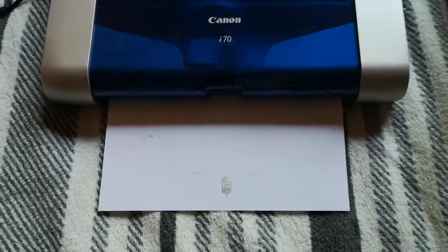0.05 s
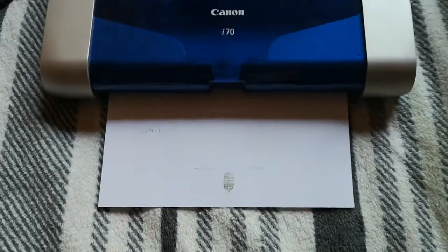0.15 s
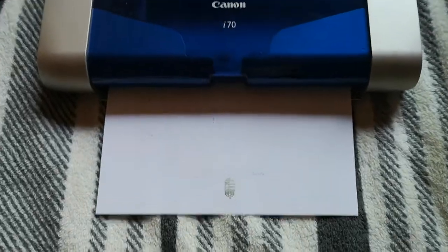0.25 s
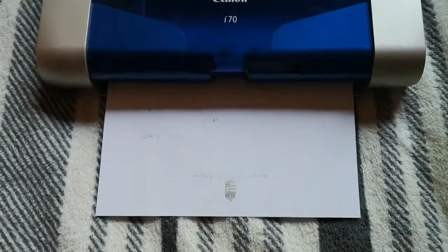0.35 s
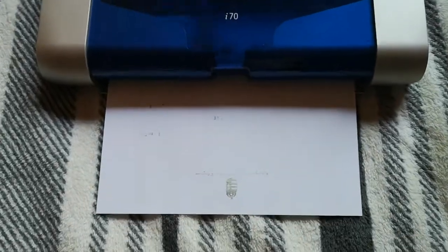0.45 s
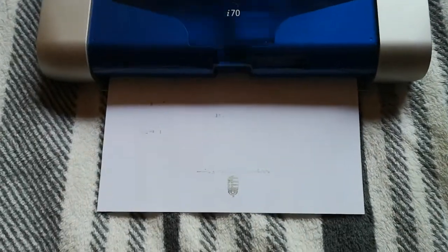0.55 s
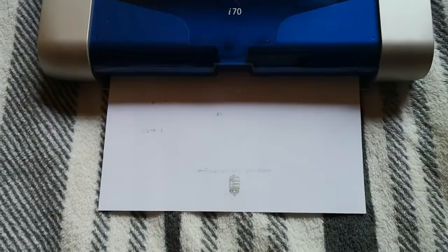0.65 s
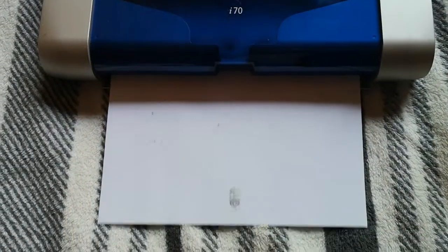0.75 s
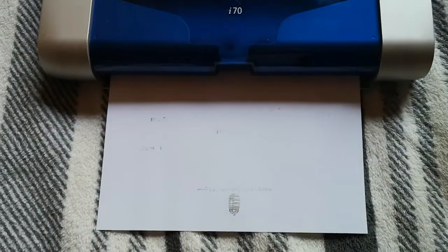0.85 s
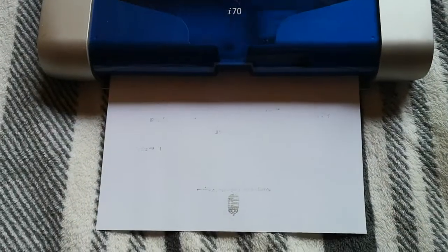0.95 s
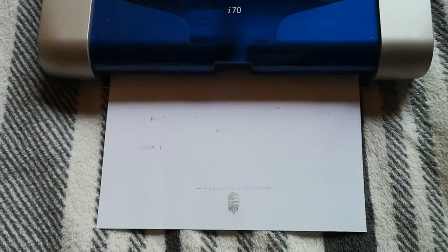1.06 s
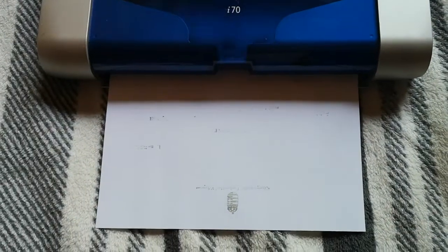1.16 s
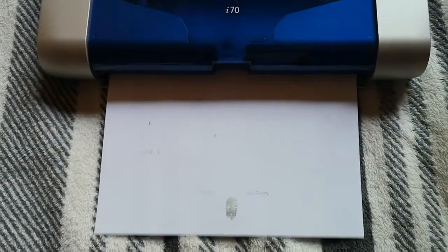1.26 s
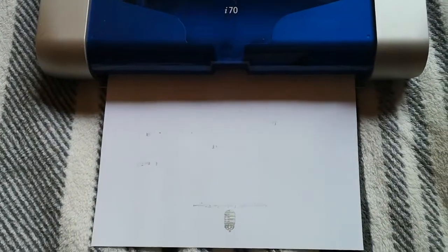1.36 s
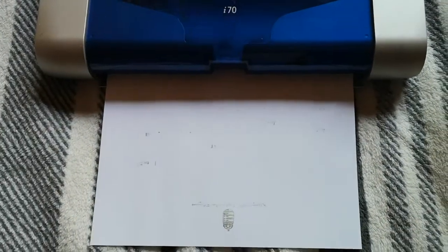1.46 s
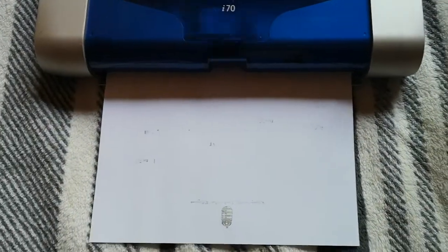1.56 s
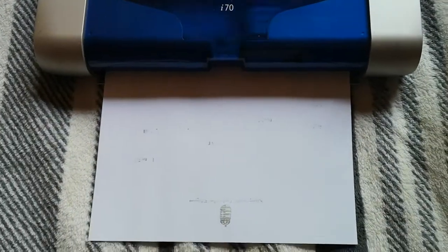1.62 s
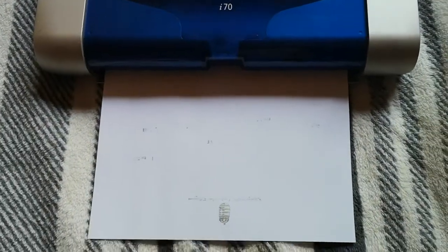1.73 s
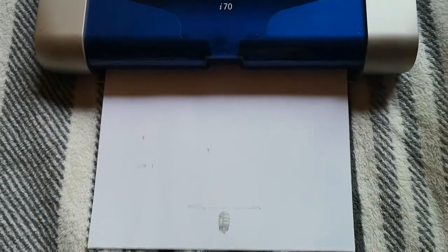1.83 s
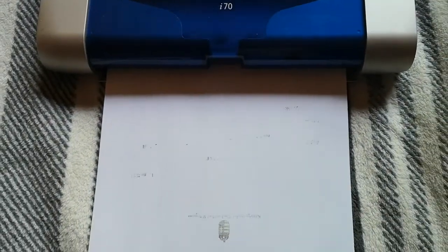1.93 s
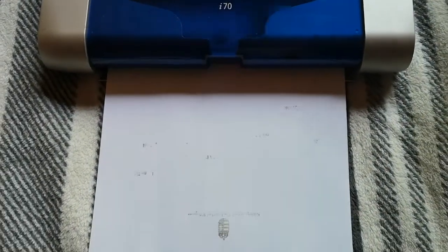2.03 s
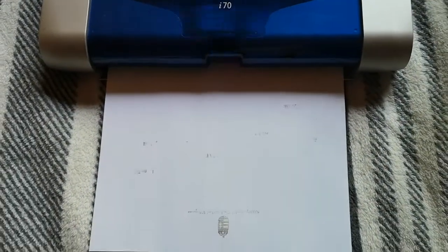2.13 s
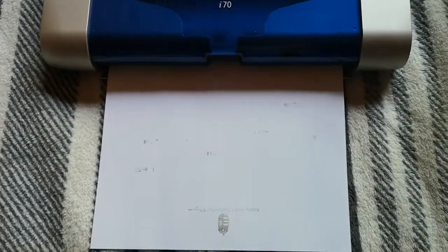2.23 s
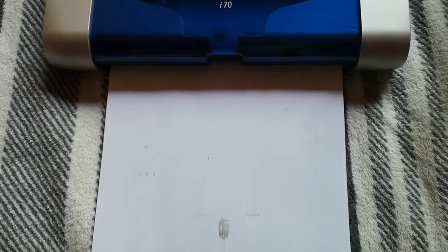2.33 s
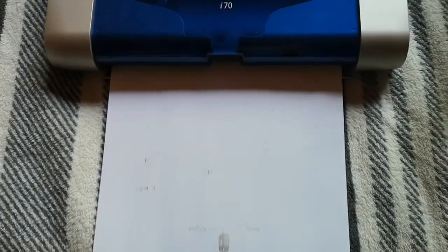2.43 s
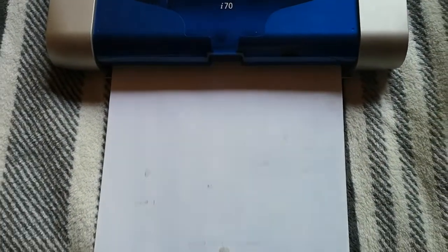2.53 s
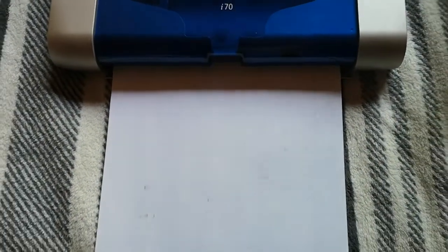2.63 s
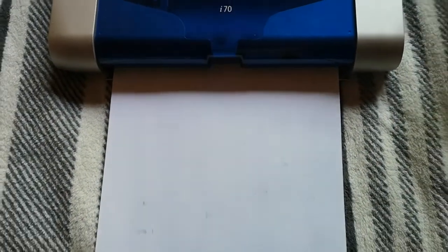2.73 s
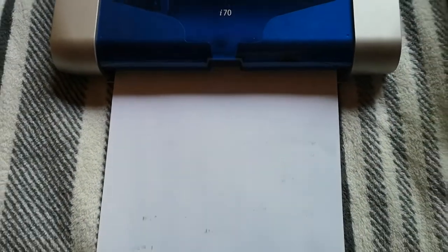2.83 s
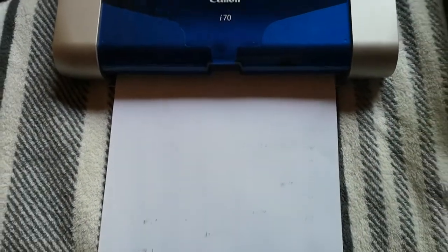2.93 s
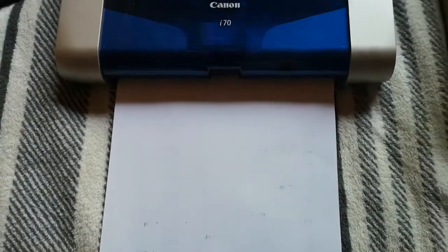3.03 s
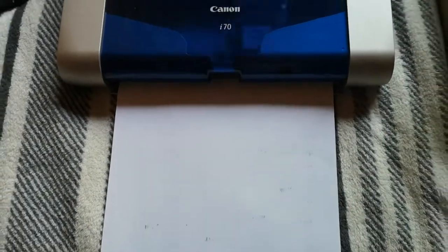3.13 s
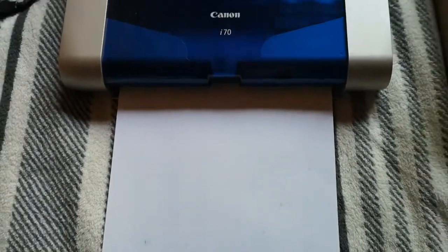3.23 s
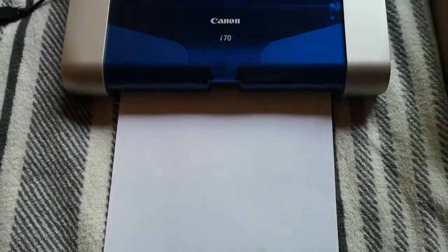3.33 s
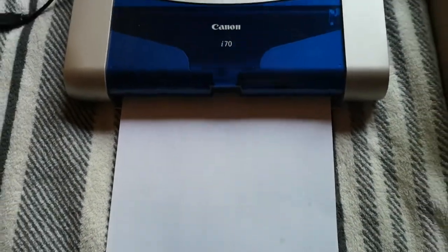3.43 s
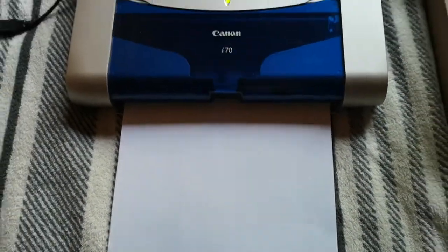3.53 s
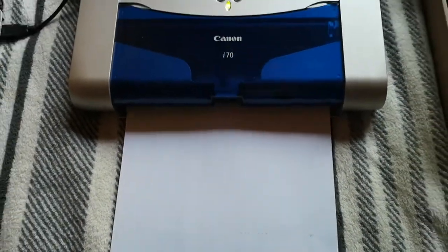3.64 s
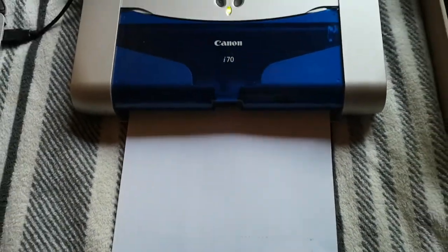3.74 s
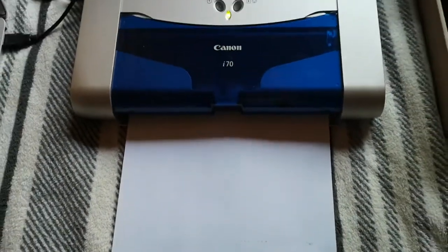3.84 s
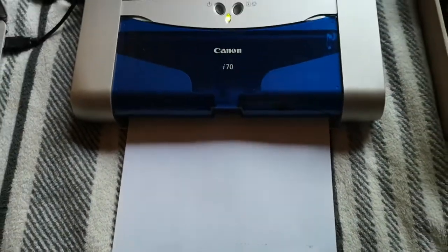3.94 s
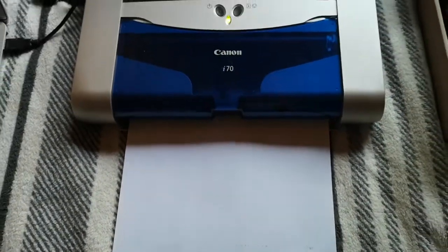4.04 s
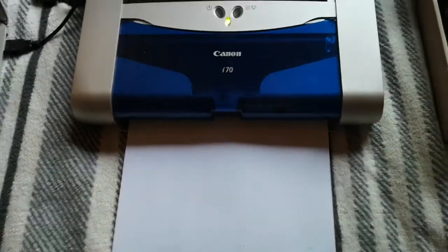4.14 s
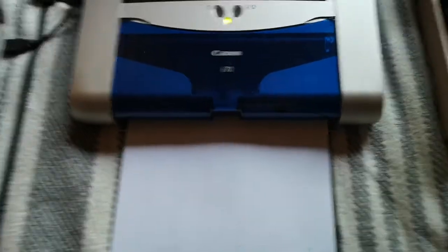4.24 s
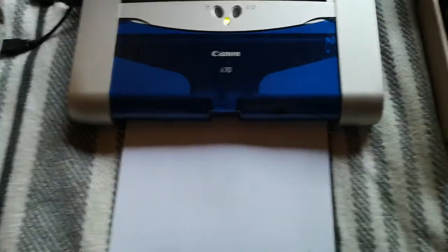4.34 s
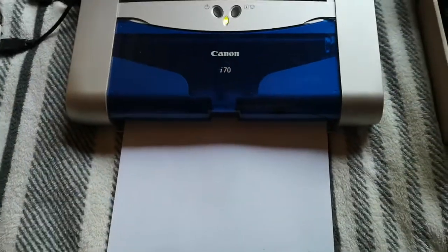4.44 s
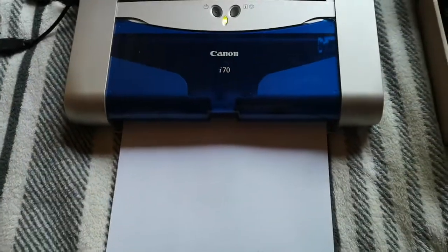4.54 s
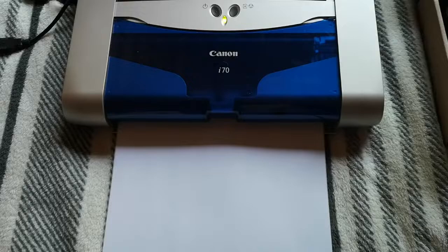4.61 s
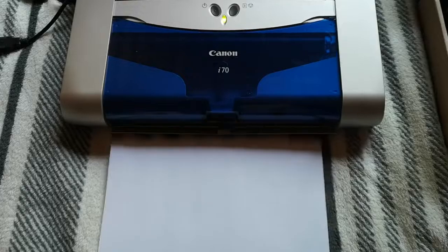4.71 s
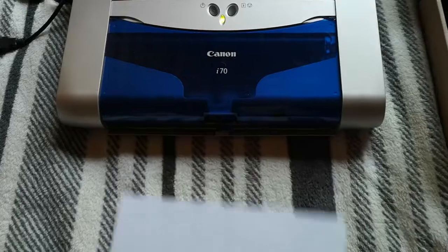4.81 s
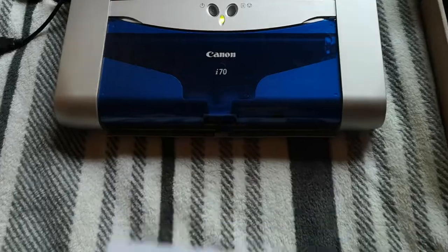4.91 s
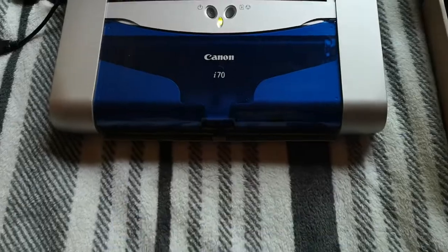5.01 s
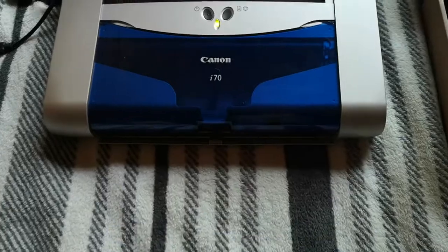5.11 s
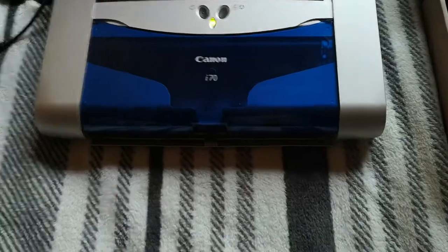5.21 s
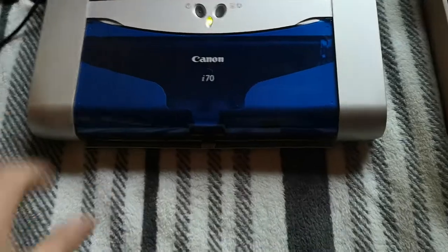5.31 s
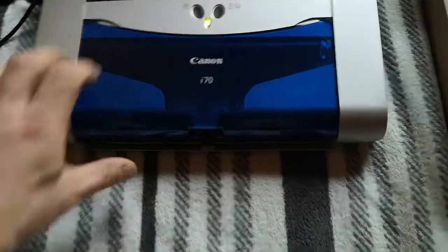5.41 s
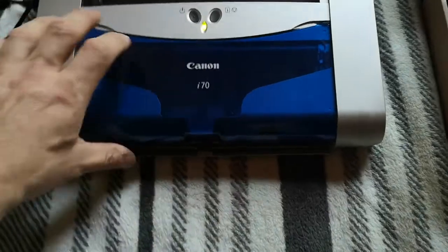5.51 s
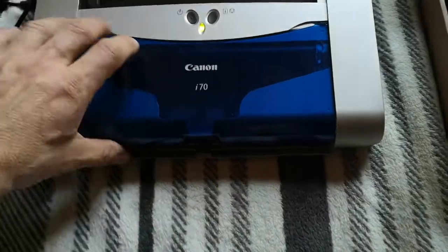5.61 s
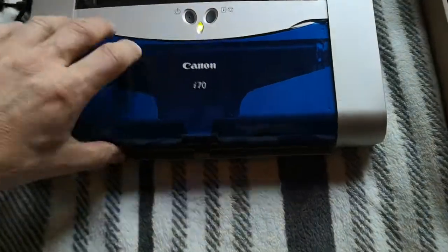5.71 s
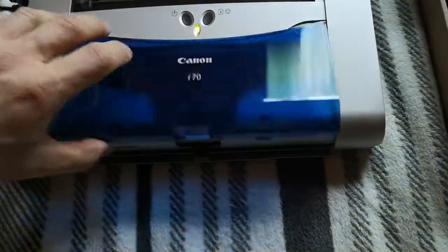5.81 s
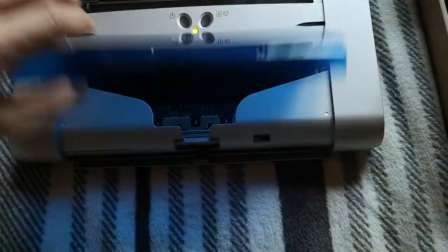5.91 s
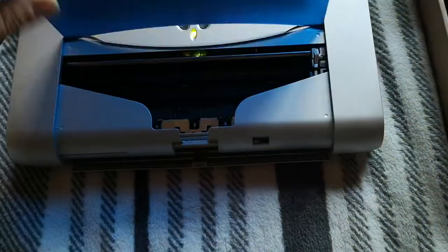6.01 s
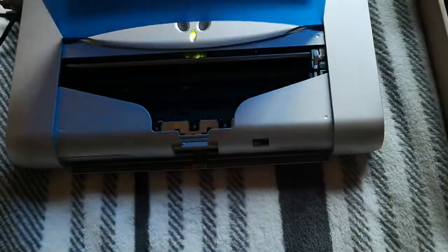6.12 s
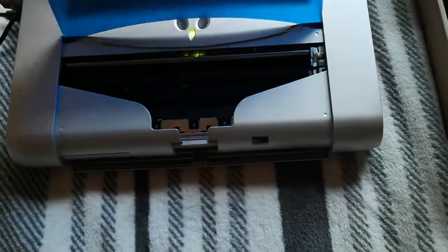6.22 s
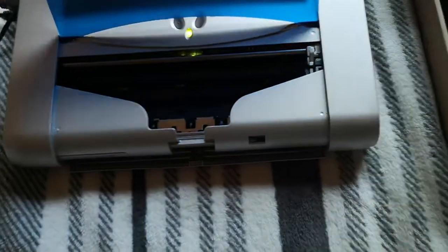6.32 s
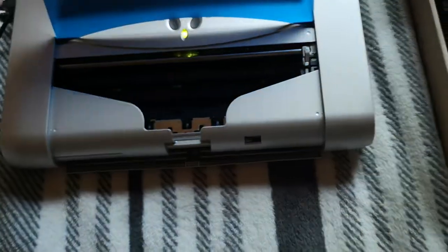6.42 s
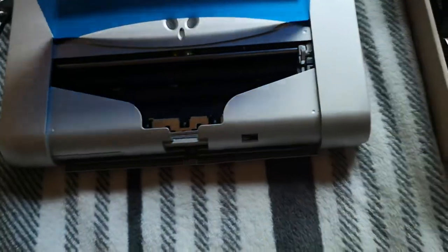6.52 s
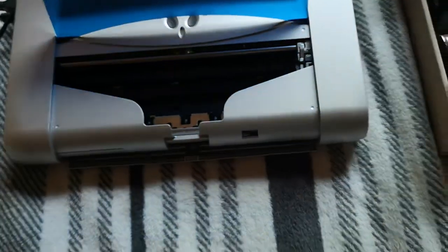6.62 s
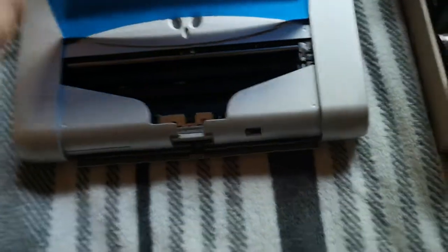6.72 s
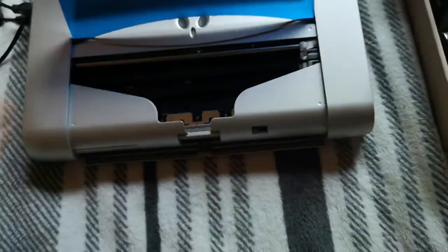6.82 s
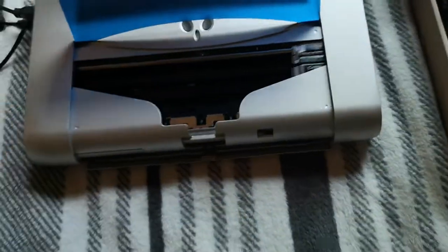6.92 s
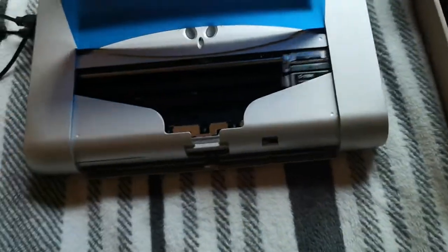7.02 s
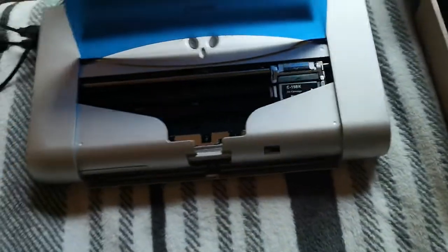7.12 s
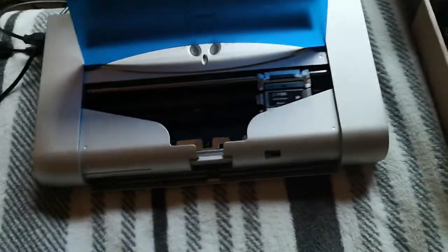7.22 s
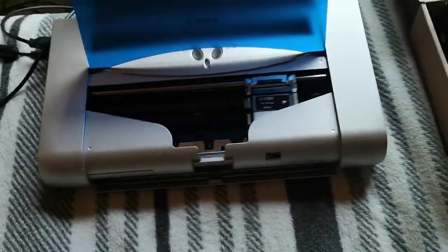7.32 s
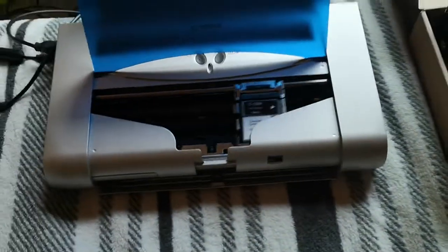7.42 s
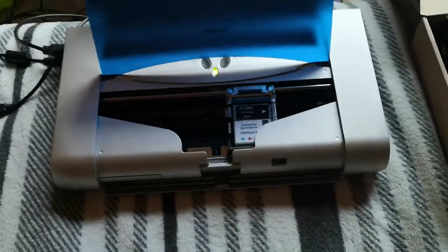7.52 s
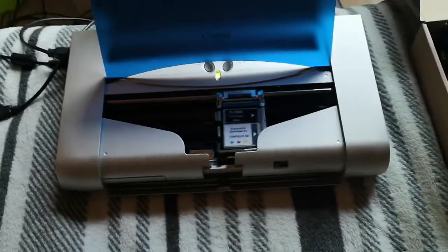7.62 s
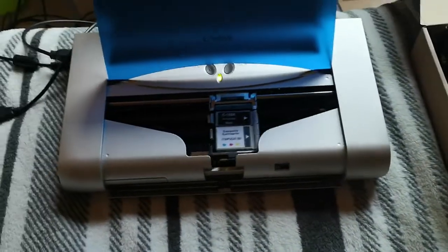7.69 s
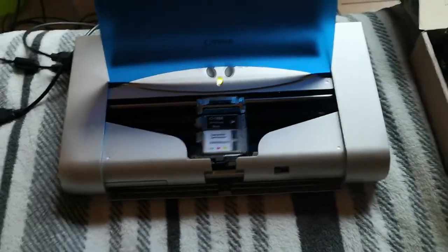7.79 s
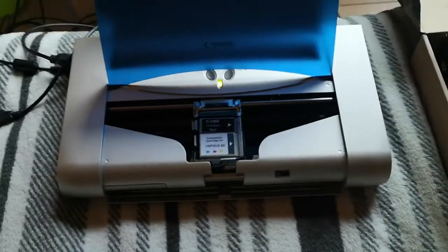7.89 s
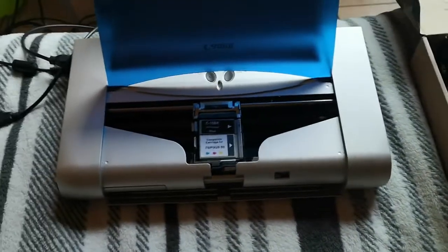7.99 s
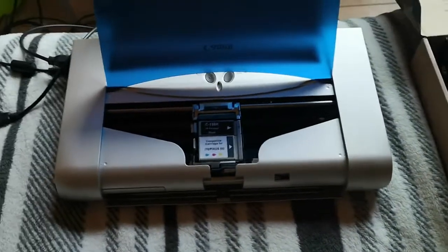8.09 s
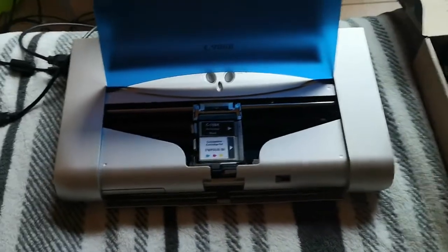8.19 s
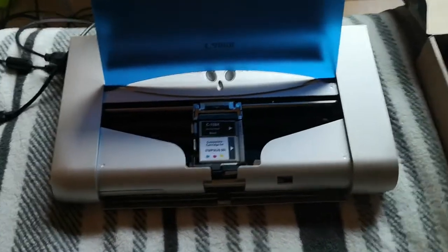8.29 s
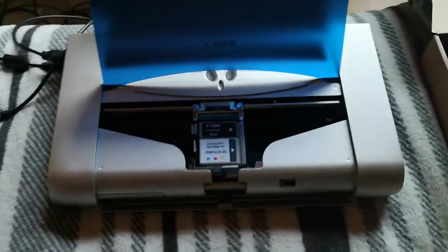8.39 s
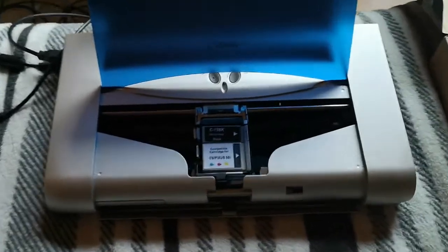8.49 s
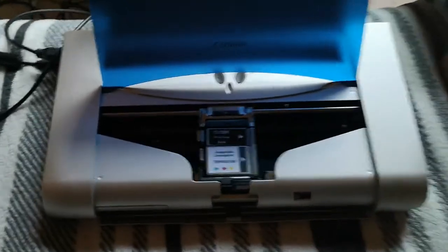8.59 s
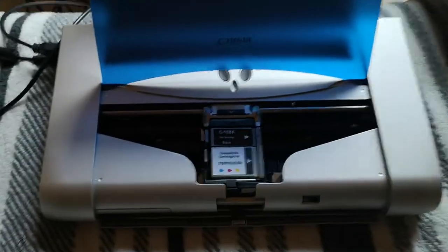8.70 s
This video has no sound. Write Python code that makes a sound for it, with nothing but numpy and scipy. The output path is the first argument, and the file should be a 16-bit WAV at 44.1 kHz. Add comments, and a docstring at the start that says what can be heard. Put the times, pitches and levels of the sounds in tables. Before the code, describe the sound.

A small inkjet printer finishes a page: loud, clacking bursts of paper feed alternate with quiet, buzzing sweeps of the print head. Two longer runs push the sheet out, and it drops with a soft rustle. The plastic lid unlatches with a sharp click and opens with small knocks and squeaks. The head then creeps along with a faint, pulsing tone. Heard close on a hand-held stereo microphone in a quiet, soft room.

```python
"""Loud, clacking runs of paper feed alternate with quiet sweeps of a belt-driven print head: a small
inkjet printer on a blanket finishes a page, heard from a hand-held stereo microphone in a soft room.
Gears rattle in the plastic case and paper hisses over the rollers; the sheet is ejected and drops.
The lid unlatches with a sharp click and swings open on a squeaky hinge, and the head creeps to the
middle of its rail with a faint, pulsing motor tone."""
import sys
import numpy as np
from scipy import signal
from scipy.fft import rfft, irfft, next_fast_len
from scipy.io import wavfile
from scipy.ndimage import uniform_filter1d

SR = 44100
rng = np.random.default_rng(int(sys.argv[2]) if len(sys.argv) > 2 else 0)


def persist_wave(psi):
    """Save psi, clipped to +-1, as 16-bit WAV."""
    counts = np.round(np.clip(psi, -1, 1) * 32767).astype(np.int16)
    wavfile.write(sys.argv[1], SR, np.atleast_2d(counts).T)


N = 385875
T = np.arange(N) / SR
FFT_SIZE = 2 * next_fast_len(N // 2 + SR // 4)
HZ = np.maximum(np.arange(FFT_SIZE // 2 + 1) * SR / FFT_SIZE, 1)

# Tone colour of each source at the microphone. Each row: frequency in Hz, relative level in dB.
ROOM_SPECTRUM = [(180, -30), (300, -1.5), (600, -11.5), (2140, -2.5), (4210, -14), (4880, -8.5),
                 (6250, -12), (7620, -8), (10100, -18.5), (14500, -20.5), (15500, -37)]
RUMBLE_SPECTRUM = [(8.8, -27), (15, 6.5), (33, -5), (59, -12.5), (134, -18.5), (162, -23), (238, -27),
                   (469, -56.5), (600, -44.5), (780, -62), (1320, -120)]
GRIP_SPECTRUM = [(30, -15), (70, -0.5), (130, 2.5), (220, -1), (340, -13), (600, -36.5), (1500, -78)]
RAIL_SPECTRUM = [(3820, -42), (6500, -26), (7850, 5), (8390, 0), (9190, 4.5), (10300, -9), (12900, -9),
                 (15000, -19)]
SOFT_HISS_SPECTRUM = [(590, -55.5), (1000, -12.5), (1120, -3.5), (1270, -12.5), (1390, -10.5), (1640, -5),
                      (2230, -3.5), (3040, -16), (4340, -16), (5040, -15.5), (5980, -16), (7610, -10.5),
                      (9250, -13), (10500, -25), (15500, -24)]   # a soft, peaky hiss while the head moves
SHEET_SPECTRUM = [(300, -32), (700, -15.5), (1200, -13), (1800, 0.5), (2400, -6.5), (3200, -15), (7500, -7),
                  (9200, -13.5), (11000, -23), (15000, -39)]
KNOCK_SPECTRUM = [(180, -58), (300, -15), (498, -15.5), (680, -1), (841, -3.5), (1700, -2), (1940, -5),
                  (2440, -7), (2920, -15), (9030, -21), (10300, -39.5), (15000, -49.5)]
LATCH_SPECTRUM = [(59, -54), (100, -18), (173, -12.5), (386, -12), (697, -5), (861, -14), (1160, -3.5),
                  (1460, -9), (1800, 1.5), (2420, -3.5), (2580, 3), (2810, -5), (6000, -15.5), (8950, -17),
                  (15500, -43.5)]
CARRIAGE_SPECTRUM = [(180, -61), (300, -24.5), (393, -22.5), (424, -22.5), (613, -1), (684, -5.5),
                     (988, -23), (1240, 0), (1380, -8), (1560, -12), (1810, -3.5), (2090, -8), (2300, -4),
                     (2990, -20.5), (4000, -17.5), (5200, -26), (8800, -120)]
PAPER_SPECTRUM = [(2060, -14.5), (3500, -0.5), (3840, 2), (5120, -5.5), (5510, 0.5), (7620, 0.5),
                  (8320, -0.5), (9350, 1.5), (11900, -15.5), (14800, -15.5), (15500, -26)]
GEAR_SPECTRUM = [(47, -41), (80, -7.5), (174, -1), (354, -11), (537, -4.5), (799, -7), (950, -6.5),
                 (1150, -1.5), (1460, -6), (1600, -1), (2000, -1), (2340, 0), (3130, -11.5), (3860, -19),
                 (5000, -16.5), (6500, -45.5), (11000, -120)]
CLACK_SPECTRUM = [(59, -29.5), (100, -25.5), (420, -12.5), (697, 0.5), (977, -12.5), (1430, -8.5),
                  (1920, 5), (3320, -7.5), (4560, -11), (5400, -15.5), (6810, -20.5), (7730, -7),
                  (8410, -19), (12300, -29), (15500, -39)]
# Resonances of the plastic. Each row: frequency in Hz, width in Hz, gain in dB.
CASE_RESONANCES = [(696, 23, 5), (769, 37, 7), (1333, 88, 4), (1580, 13, 3), (1818, 70, 4.5), (1998, 71, 5),
                   (2145, 58, 5.5), (2273, 58, 4.5), (3720, 110, 1.5), (3980, 24, -4), (4480, 100, 1.5),
                   (4980, 90, 5), (6720, 70, 6), (7402, 110, 6), (7860, 38, 2.5), (8920, 70, 7.5)]
TRAY_RESONANCES = [(1265, 52, 8), (1470, 33, 7.5), (1630, 30, 3.5), (1817, 44, 4.5), (2400, 58, 4)]   # lid and tray
# Stereo width from where the microphone is held. Each row: frequency in Hz, side against mid in dB.
ROOM_WIDTH = [(60, -28), (180, -9), (550, 5), (1650, -4.5), (4970, 1), (15000, -1)]
LID_WIDTH = [(60, -21), (130, -22.5), (290, -11), (640, -7), (1410, -4.5), (3100, 1), (6820, 0),
             (15000, 3.5)]
PRINT_WIDTH = [(60, -23), (110, -27), (200, -19), (380, -10), (700, -5), (1290, -5), (2380, 2), (4400, -2),
               (8120, 0), (15000, -1)]
# Lean to one side, as far as the width allows. Each row: frequency in Hz, left against right in dB.
ROOM_LEAN = [(60, -0.5), (240, 1), (950, 0), (3770, -0.5), (15000, -1.5)]
LID_LEAN = [(60, 1), (130, 6), (290, -5), (640, 0.5), (1410, -12.5), (3100, -3.5), (6820, 1),
            (15000, -23.5)]
PRINT_LEAN = [(60, -18.5), (99, -0.5), (160, 0), (270, 1), (450, -2), (740, -3), (1220, -4.5),
              (2010, -10.5), (3330, -1), (5500, 0.5), (9080, -9.5), (15000, -20.5)]

# A hand rubs on case or microphone. Each row: start and stop in seconds, level in dB.
HAND_RUBS = [(5.484, 5.852, -70), (7.308, 7.6, -78.5), (8.1, 8.604, -72.5)]
# Bumps on the microphone. Each row: start in seconds, level in dB, pitch in Hz, t60 in seconds.
MIC_THUMPS = [(7.36, -38, 44, 0.49), (7.379, -44, 75, 0.33), (8.11, -39.5, 21.3, 0.4),
              (8.26, -41.5, 20.1, 0.52)]
# The sheet brushes case and blanket. Each row: middle and half length in seconds, level in dB.
SHEET_SWISHES = [(4.453, 0.23, -70.5), (4.845, 0.034, -59.5), (4.955, 0.11, -71), (5.094, 0.026, -70),
                 (5.198, 0.016, -74)]
# Squeaks of the hinge. Each row: start in seconds, pitch in Hz, peak in dB, t60 in seconds.
HINGE_SQUEAKS = [(6.287, 1605, -43, 0.065), (6.34, 1595, -50, 0.15), (6.616, 1742, -52, 0.33),
                 (6.615, 4050, -62, 0.089), (6.615, 7300, -63, 0.12)]
# Ringing of the lid. Each row: frequency in Hz, relative level in dB, t60 in seconds.
LID_MODES = [(1300, -45, 0.63), (1450, -42, 0.47), (1690, -36, 0.28)]
# Single impacts. Each row: start in seconds, relative body and treble levels in dB.
SHEET_TAPS = [(4.316, -39.5, -66.5), (4.753, -44, -63.5), (5.098, -47, -74)]
LIGHT_KNOCKS = [(.573, -42.5, -68), (1.614, -48, -87), (5.802, -43, -59), (6.071, -41, -51.5),
                (6.108, -38.5, -62), (6.136, -40, -75), (6.166, -41.5, -77), (6.255, -36, -64.5),
                (6.286, -53, -76), (6.37, -52, -72), (6.615, -52, -68), (6.673, -46.5, -81.5),
                (6.878, -46, -78), (6.946, -53, -82), (8.014, -58.5, -84)]
LATCH_HITS = [(5.887, -23, -24), (5.889, -28.5, -17.5), (5.893, -22.5, -41), (5.907, -22.5, -27),
              (5.91, -33.5, -25), (5.915, -25, -38)]
GEAR_TICKS = [(.909, -35.5, -46), (2.966, -47, -34.5), (3.389, -45.5, -50), (3.936, -34.5, -48)]
# Passes of the head. Each row: start and stop in seconds, relative carriage and whine levels in dB.
HEAD_SWEEPS = [(0.083, 0.379, -61.5, -67), (0.569, .86, -57.5, -59), (1.076, 1.368, -63.5, -71),
               (1.619, 1.93, -58.5, -58), (2.172, 2.456, -62, -57.5), (3.112, 3.302, -57, -53.5)]
# Buzz of the belt. Each entry: relative level in dB of the next harmonic of the tooth rate.
BELT_HARMONICS = [-5, -22, 0, -22.5]
# Runs of the paper feed. Each row: start and stop in seconds, relative level of the first jolt in dB.
FEED_RUNS = [(.005, 0.07, -31.5), (0.38, .552, -36), (0.868, 1.047, -32), (1.418, 1.586, -50),
             (1.957, 2.146, -37), (2.483, 3.101, -39), (3.352, 3.999, -52)]
# Hum of the feed motor. Each row: frequency in Hz, level against the gear rattle in dB.
FEED_HUM = [(126, -14), (188, -18.5), (252, -22.5), (397, -25.5), (594, -16.5), (685, -18.5)]
# Clacking in the longer runs. Each row: time of one hard clack in seconds, relative hard and soft
# levels in dB.
GEAR_TURNS = [(.497, -26.5, -28), (.879, -27, -28.5), (1.447, -25.5, -27), (2.017, -25.5, -27.5),
              (2.553, -23.5, -27), (3.451, -26.5, -30)]
# Contacts within a clack. Each row: delay in seconds, body and treble against the clack's level in dB.
HARD_CLACK = [(-.004, -10.5, -22), (0, -0.5, -6), (.002, -4.5, -9)]
SOFT_CLACK = [(0, -1.5, -19), (.015, -7.5, -20)]
JOLT = [(0.00094, 0, -8)]

CREEP_START_S, CREEP_STOP_S = 6.98, 8.03


def from_db(db):
    """Decibels to gain."""
    return 10 ** (np.asarray(db) / 20)


def unit_rms(x):
    """Scale to unit rms."""
    return x / np.sqrt(np.mean(x ** 2) + 1e-20)


def over_hz(points):
    """A table joined by straight lines on a log-frequency axis."""
    hz, value = np.transpose(points)
    return np.interp(np.log(HZ), np.log(np.maximum(hz, 1)), value)


def running(start, stop, ramp_s):
    """1 from start to stop, 0 outside, with short ramps."""
    return np.clip(np.minimum(T - start, stop - T) / ramp_s + .5, 0, 1)


def drift(per_s):
    """A random wander through values of spread 1."""
    knots = rng.standard_normal(4000)
    return np.interp(T * per_s, np.arange(len(knots)), knots)


def colour(x, spectrum, resonances=()):
    """Causal filter of unit power gain with a broad spectrum and narrow resonances."""
    peaks_db = sum(db / (1 + (2 * (HZ - hz) / width) ** 2) for hz, width, db in resonances)
    cepstrum = irfft(np.log(unit_rms(from_db(over_hz(spectrum) + peaks_db))))
    cepstrum[1:FFT_SIZE // 2] *= 2   # fold to minimum phase
    cepstrum[FFT_SIZE // 2 + 1:] = 0
    return irfft(rfft(x, FFT_SIZE) * np.exp(rfft(cepstrum)))[:N]


def hiss(spectrum, resonances=()):
    """Smooth coloured noise of unit rms."""
    return colour(rng.standard_normal(N), spectrum, resonances)


def grains(per_s, spread_db):
    """Tiny random clicks of uneven strength, at unit rms."""
    clicks = (rng.random(N) < per_s / SR) * rng.choice([-1, 1], N)
    return unit_rms(clicks * from_db(spread_db * rng.standard_normal(N)))


def add(out, start, sound):
    """Mix a short sound in at a time in seconds."""
    at = max(round(start * SR), 0)
    out[at:at + len(sound)] += sound[:N - at]


def blows(rows, spectrum, resonances, body_db, treble_db, chatter_s, tail_s, tail_db):
    """Each blow chatters for a moment, then the plastic rings out; body and treble split at 3700 Hz."""
    t, body, treble = T[:SR // 4], np.zeros(N), np.zeros(N)
    fade = np.exp(-t / chatter_s) + from_db(tail_db) * np.exp(-t / tail_s)
    for start, low_db, high_db in rows:
        chatter = rng.choice([-1, 1], len(t)) * fade
        add(body, start, from_db(low_db + body_db) * chatter)
        add(treble, start, from_db(high_db + treble_db) * chatter)
    low, high = (signal.butter(3, 3700, kind, fs=SR, output="sos") for kind in ("low", "high"))
    impacts = signal.sosfilt(low, body + 1e-18) + signal.sosfilt(high, treble + 1e-18)
    return colour(impacts, spectrum, resonances)


def stereo_microphone(mid, width, lean, scatter_s):
    """The side signal is part direct sound, part sound scattered evenly by nearby surfaces."""
    side_gain, power_ratio = from_db(over_hz(width)), from_db(over_hz(lean)) ** 2
    direct = (1 + side_gain ** 2) / 2 * (power_ratio - 1) / (power_ratio + 1)
    direct = np.clip(direct, -.75 * side_gain, .75 * side_gain)
    t = T[:SR // 8]
    scatter = rfft(rng.standard_normal(len(t)) * np.exp(-t / scatter_s), FFT_SIZE)
    scatter /= np.sqrt(uniform_filter1d(np.abs(scatter) ** 2, size=1200))
    paths = direct + np.sqrt(side_gain ** 2 - direct ** 2) * scatter
    side = irfft(rfft(mid, FFT_SIZE) * paths)[:N]
    return np.array([mid + side, mid - side])


def room_tone(level_db=-73.5):
    """The faint, steady hiss of the room around the microphone."""
    return from_db(level_db) * hiss(ROOM_SPECTRUM)


def room_echo(x, wet_db, t60):
    """A soft-furnished room returns a faint, short tail to each side."""
    t = T[:SR // 2]
    tail = rng.standard_normal((2, len(t))) * from_db(-60 * t / t60) * (t > .006)
    tail /= np.sqrt(np.sum(tail ** 2, axis=1, keepdims=True))
    return from_db(wet_db) * signal.fftconvolve(x[None], tail, axes=1)[:, :N]


def handling(rumble_db=-58, lumpy_db=5):
    """Right at the microphone: low rumble, the lumpy rub of a shifting grip and a few soft thumps."""
    t = T[:SR]
    out = from_db(rumble_db + .5 * drift(4)) * hiss(RUMBLE_SPECTRUM)
    grip = sum(from_db(db) * running(start, stop, ramp_s=.079) for start, stop, db in HAND_RUBS)
    out += grip * from_db(lumpy_db * drift(22)) * hiss(GRIP_SPECTRUM)
    for start, db, hz, t60 in MIC_THUMPS:
        add(out, start, -from_db(db - 60 * t / t60) * np.sin(2 * np.pi * hz * t))
    return out


def creep_hiss(rail_db=-77, soft_hiss_db=-76):
    """The creeping head slides on its rail, along with a soft, peaky hiss."""
    rail = from_db(rail_db) * hiss(RAIL_SPECTRUM)
    soft_hiss = from_db(soft_hiss_db) * hiss(SOFT_HISS_SPECTRUM)
    return running(CREEP_START_S, CREEP_STOP_S, ramp_s=.02) * (rail + soft_hiss)


def creep_tone(level_db=-68.5, tone_hz=1255, bend_hz=45, cogging_hz=37.3, uneven_db=3):
    """At low speed the head's motor cogs: its tone swells and bends with every step."""
    cog = 2 * np.pi * np.cumsum(cogging_hz * (1 + .0368 * drift(4.7))) / SR
    pitch_hz = tone_hz - bend_hz * np.sin(cog) + 62 * drift(250)
    tone = np.sin(2 * np.pi * np.cumsum(pitch_hz) / SR)
    swell = unit_rms(np.exp(1.1 * np.cos(cog))) * from_db(uneven_db * drift(37))
    return running(CREEP_START_S, CREEP_STOP_S, ramp_s=.01) * from_db(level_db) * swell * tone


def sheet_drop(uneven_db=4.5):
    """The loose sheet flicks off the rollers, crinkles as it slides and settles on the blanket."""
    crinkles = grains(per_s=4000, spread_db=2)
    swish = sum(from_db(db) * np.exp(-((T - at) / half_s) ** 2) for at, half_s, db in SHEET_SWISHES)
    swish *= from_db(uneven_db * drift(30))
    taps = blows(SHEET_TAPS, SHEET_SPECTRUM, TRAY_RESONANCES,
                 body_db=-13.5, treble_db=4.5, chatter_s=.0073, tail_s=.029, tail_db=-2.5)
    return taps + swish * colour(crinkles, SHEET_SPECTRUM, TRAY_RESONANCES)


def hinge():
    """The swinging lid's hinge gives short, unsteady squeaks that die away."""
    out, t = np.zeros(N), T[:SR]
    for start, hz, db, t60 in HINGE_SQUEAKS:
        phase = 2 * np.pi * np.cumsum(hz * (1 + .016 * drift(204)[:SR])) / SR
        add(out, start, from_db(db - 60 * t / t60) * np.sin(phase))
    return out


def knocks():
    """Small knocks as the lid swings up and the head leaves its rest and stops."""
    return blows(LIGHT_KNOCKS, KNOCK_SPECTRUM, TRAY_RESONANCES,
                 body_db=-15.5, treble_db=9, chatter_s=.0053, tail_s=.039, tail_db=2)


def lid_latch(ring_db=-7):
    """The latch snaps and rebounds, and the lid rings on faintly."""
    out = blows(LATCH_HITS, LATCH_SPECTRUM, CASE_RESONANCES,
                body_db=-2, treble_db=2, chatter_s=.0026, tail_s=.032, tail_db=-17)
    t, snap_s = T[:SR], LATCH_HITS[0][0]
    for hz, db, t60 in LID_MODES:
        add(out, snap_s, from_db(ring_db + db - 60 * t / t60) * np.sin(2 * np.pi * hz * t))
    return out


def head_sweeps(tooth_hz=603, rise_hz=20, slide_db=-2.5, belt_db=-10.5, whine_db=-3.5, soft_hiss_db=-67):
    """Belt teeth buzz and pulse the carriage's hiss; the motor whines an octave up in mid-sweep."""
    level, whine_level, arch = np.zeros((3, N))
    for start, stop, db, motor_db in HEAD_SWEEPS:
        swell = np.sin(np.pi * np.clip((T - start) / (stop - start), 0, 1)).clip(0)
        level += from_db(db) * running(start, stop, ramp_s=.025)
        whine_level += from_db(motor_db + whine_db) * swell ** 5.5
        arch += swell
    flutter = 1 + .007 * drift(130)
    phase = 2 * np.pi * np.cumsum((tooth_hz + rise_hz * arch) * flutter) / SR
    belt = sum(from_db(db + belt_db + 5.5 * drift(25.2)) * np.sin(k * phase)
               for k, db in enumerate(BELT_HARMONICS, 1))
    friction = rng.standard_normal(N) * (1 + .36 * np.cos(phase))
    slide = from_db(slide_db) * colour(friction, CARRIAGE_SPECTRUM)
    soft_hiss = from_db(soft_hiss_db) * arch ** .34 * hiss(SOFT_HISS_SPECTRUM)
    whine = whine_level * from_db(2.5 * drift(30)) * np.sin(2 * phase)
    return level * (belt + slide) + whine + soft_hiss


def feed_coasting(level_db=-61, top_hz=195, fall_s=.11, fade_s=.076):
    """Between runs the feed motor's hum sinks in pitch and fades."""
    out, t = np.zeros(N), T[:SR // 2]
    phase = 2 * np.pi * np.cumsum(top_hz * np.exp(-t / fall_s)) / SR
    for _, stop, _ in FEED_RUNS[:-1]:   # the ejecting run stops dead
        add(out, stop, from_db(level_db) * np.exp(-t / fade_s) * np.sin(phase))
    return out


def paper_feed(rattle_db=-43, paper_db=-49, sheet_leaves_s=3.8, speed_up_s=.095, slow_down_s=.062):
    """Gear teeth rattle, the motor hums and the sheet hisses over the rollers, all louder with speed."""
    speed = np.zeros(N)
    for start, stop, _ in FEED_RUNS:
        ramp = np.minimum(.5 + (T - start) / speed_up_s, .24 + (stop - T) / slow_down_s)
        gate = np.clip(np.minimum(T - start, stop - T) / .0045, 0, 1)
        speed += np.clip(ramp, 0, 1) * gate
    rattle = colour(grains(per_s=5000, spread_db=5.5), GEAR_SPECTRUM, CASE_RESONANCES)
    motor_time = np.cumsum(1 + .01485 * drift(30)) / SR
    hum = sum(from_db(db + 7.3 * drift(35)) * np.sin(2 * np.pi * hz * motor_time) for hz, db in FEED_HUM)
    drop_db = 5.5 * (T > sheet_leaves_s)   # the sheet's end clears the rollers
    paper = from_db(paper_db - drop_db + 2.3 * drift(300)) * hiss(PAPER_SPECTRUM, CASE_RESONANCES)
    return from_db(rattle_db) * speed * (rattle + hum) + speed ** 3.2 * paper


def gear_clacks(turn_s=.1464, soft_after_s=.071, spin_up_s=.02, brake_s=.05):
    """The gears jolt as a run starts and stops; at speed each turn gives a hard and a soft clack."""
    clacks = [(start, jolt_db, JOLT) for start, _, jolt_db in FEED_RUNS]
    clacks += [(stop - .016, -45, JOLT) for _, stop, _ in FEED_RUNS]   # the gear play closes
    for hard_s, hard_db, soft_db in GEAR_TURNS:
        start, stop, _ = next(run for run in FEED_RUNS if hard_s < run[1])
        for turn in np.arange(hard_s - turn_s, stop, turn_s):
            pair = [(turn, hard_db, HARD_CLACK), (turn + soft_after_s, soft_db, SOFT_CLACK)]
            clacks += [clack for clack in pair if start + spin_up_s < clack[0] < stop - brake_s]
    contacts = [(at + delay, db + body, db + treble)
                for at, db, kind in clacks for delay, body, treble in kind]
    return blows(contacts + GEAR_TICKS, CLACK_SPECTRUM, CASE_RESONANCES,
                 body_db=2, treble_db=9, chatter_s=.0022, tail_s=.014, tail_db=-12)


def scene():
    """Printing, then the lid, over the quiet room; each part reaches the microphone by its own paths."""
    printing = [paper_feed() + feed_coasting(), gear_clacks(), head_sweeps() + creep_hiss()]
    opening = [lid_latch(), knocks() + hinge() + sheet_drop()]
    background = creep_tone() + handling() + room_tone()
    return (sum(stereo_microphone(part, PRINT_WIDTH, PRINT_LEAN, scatter_s=.014) for part in printing)
            + sum(stereo_microphone(part, LID_WIDTH, LID_LEAN, scatter_s=.0073) for part in opening)
            + stereo_microphone(background, ROOM_WIDTH, ROOM_LEAN, scatter_s=.05)
            + room_echo(sum(printing + opening), wet_db=-21, t60=.25))


def record(dry):
    """The treble is cut steeply above 15700 Hz."""
    return signal.sosfilt(signal.ellip(10, .1, 80, 15700, fs=SR, output="sos"), dry)


dry = scene()
out = record(dry)
persist_wave(out)
```